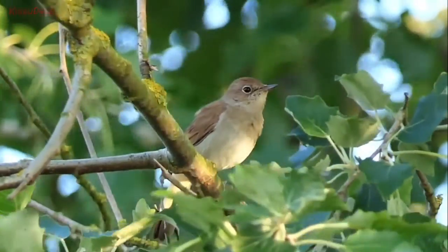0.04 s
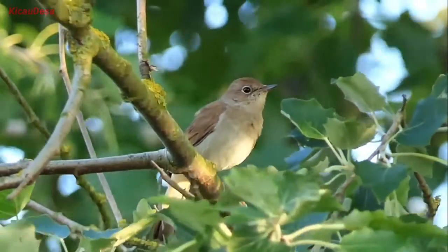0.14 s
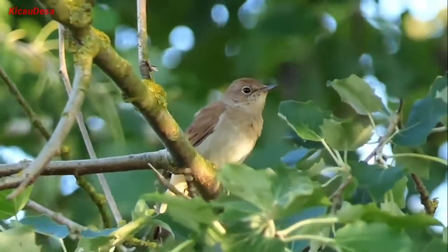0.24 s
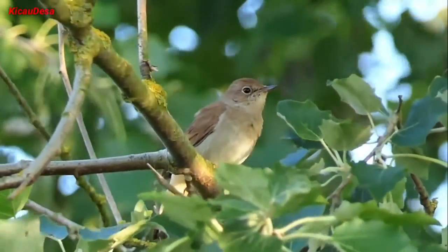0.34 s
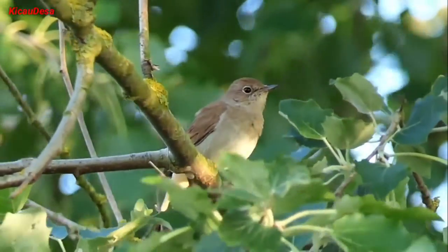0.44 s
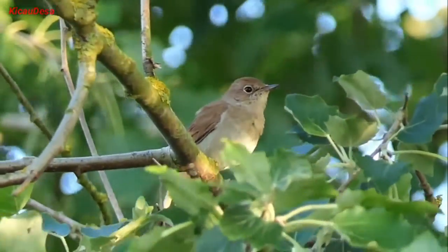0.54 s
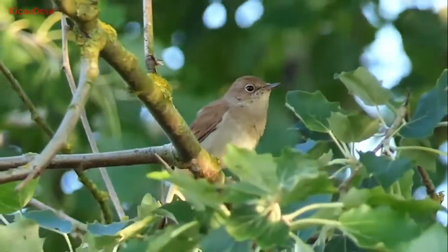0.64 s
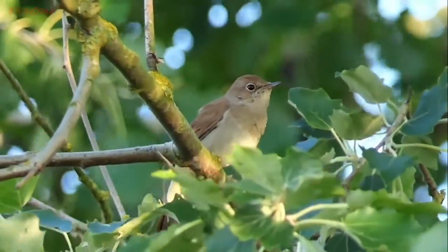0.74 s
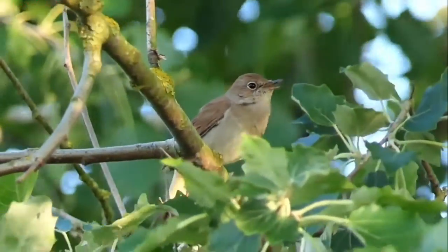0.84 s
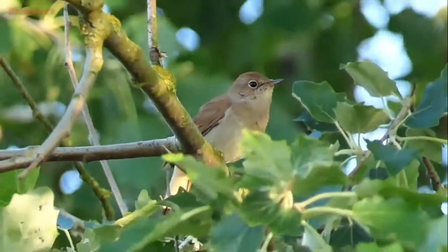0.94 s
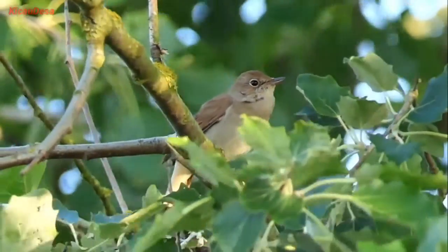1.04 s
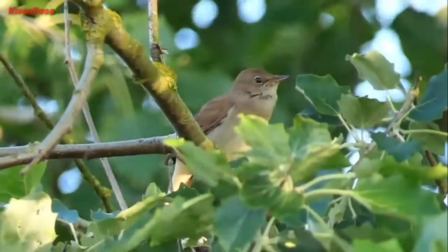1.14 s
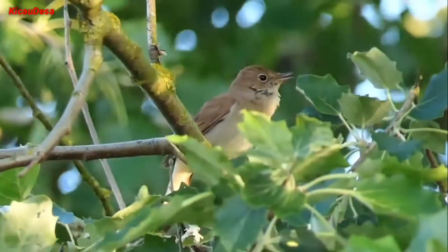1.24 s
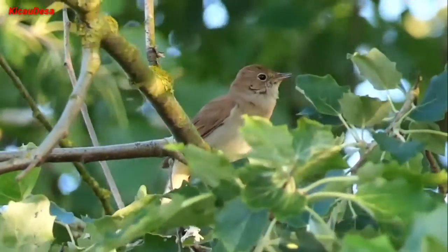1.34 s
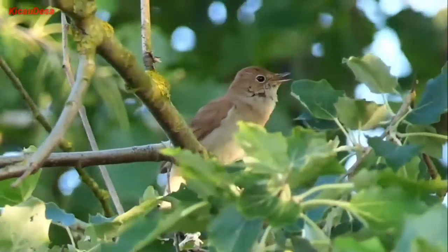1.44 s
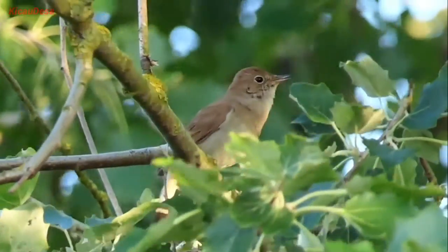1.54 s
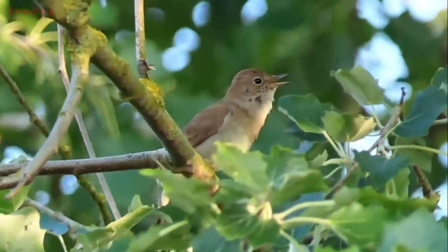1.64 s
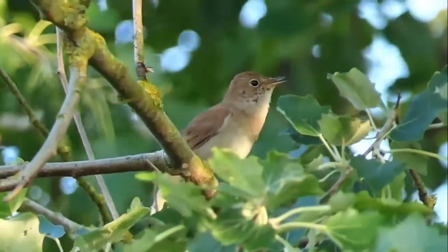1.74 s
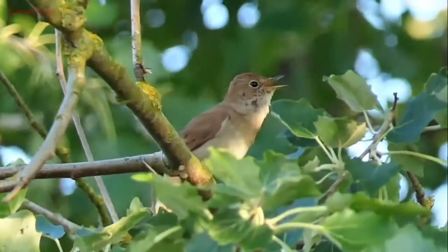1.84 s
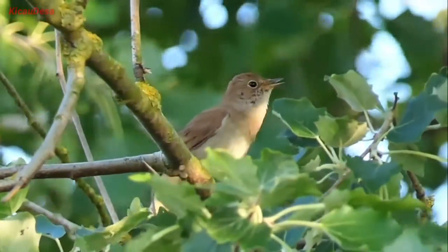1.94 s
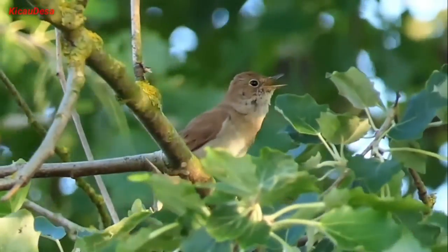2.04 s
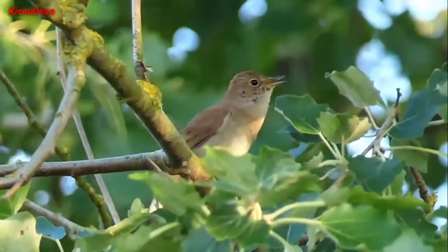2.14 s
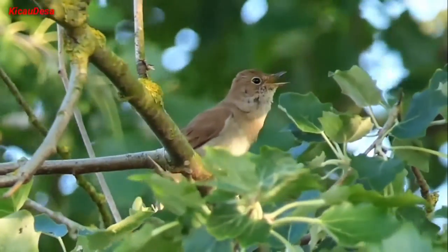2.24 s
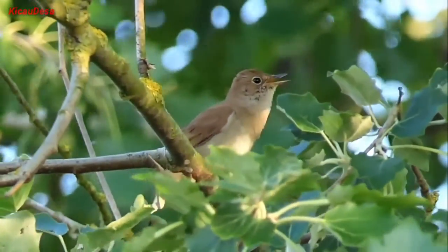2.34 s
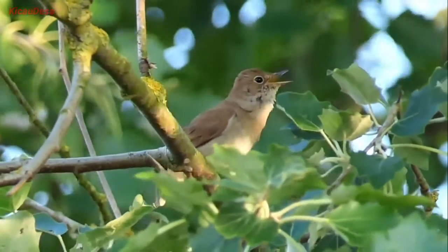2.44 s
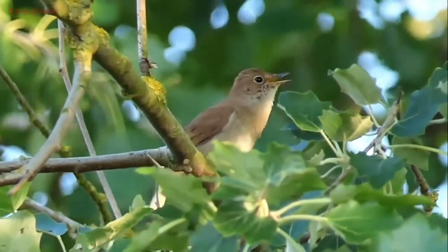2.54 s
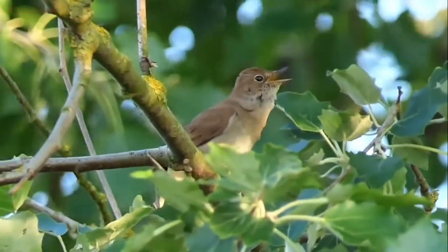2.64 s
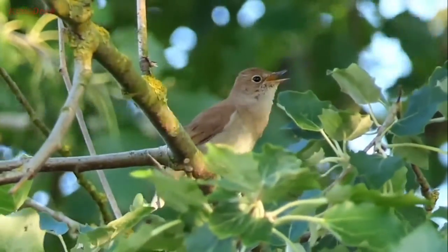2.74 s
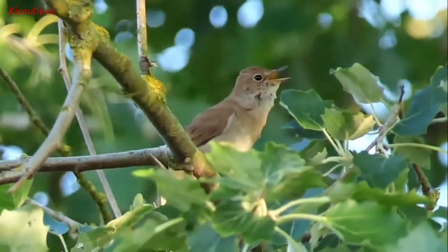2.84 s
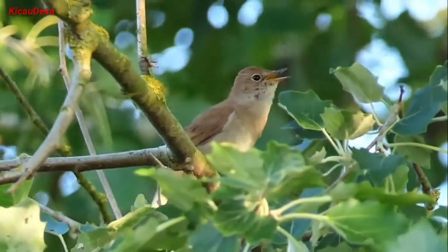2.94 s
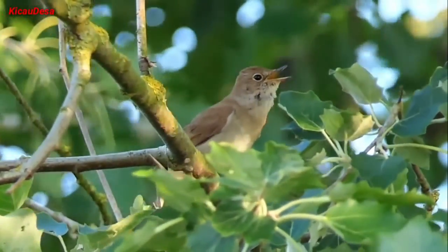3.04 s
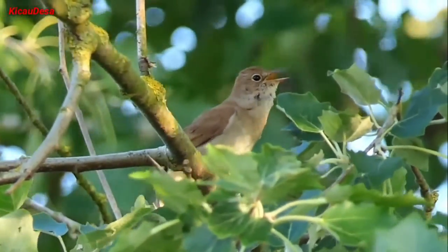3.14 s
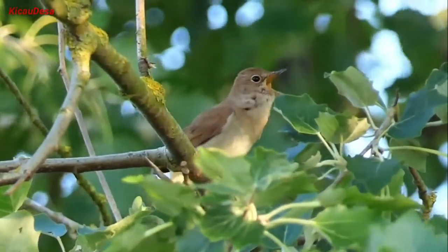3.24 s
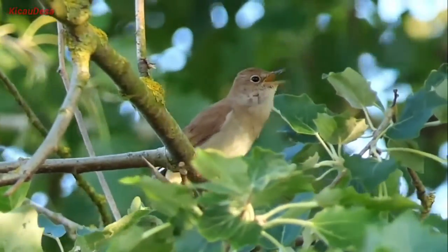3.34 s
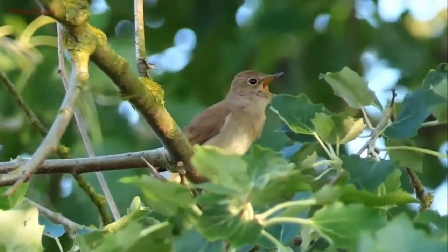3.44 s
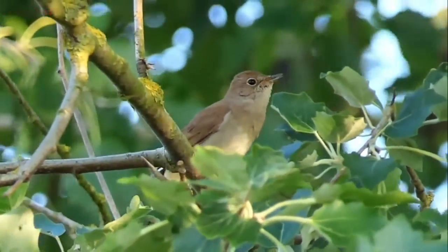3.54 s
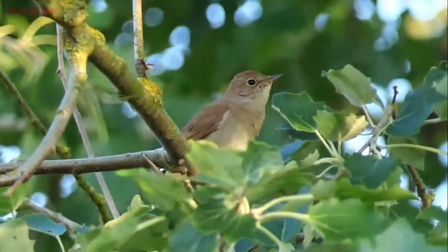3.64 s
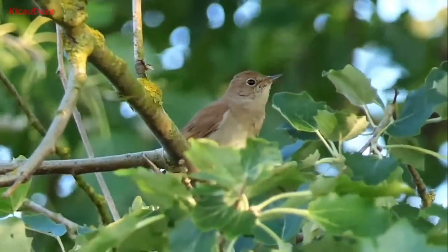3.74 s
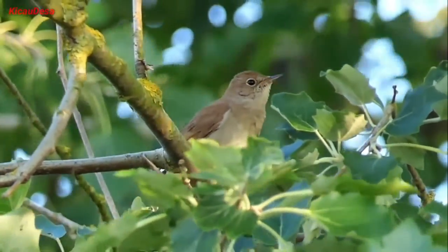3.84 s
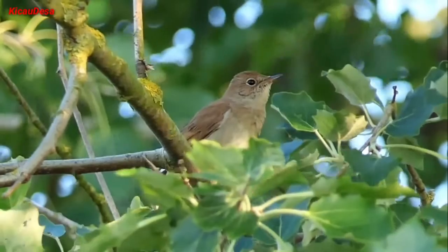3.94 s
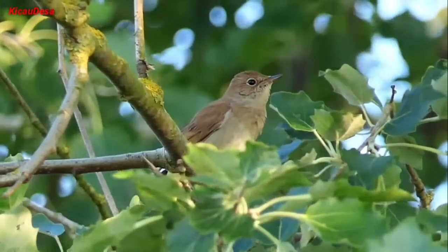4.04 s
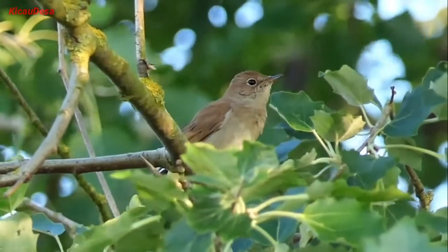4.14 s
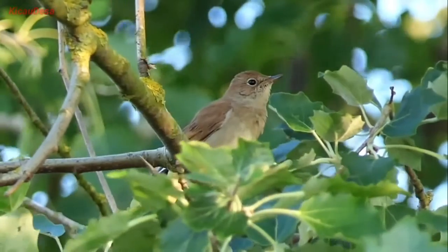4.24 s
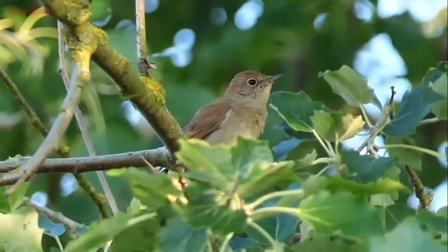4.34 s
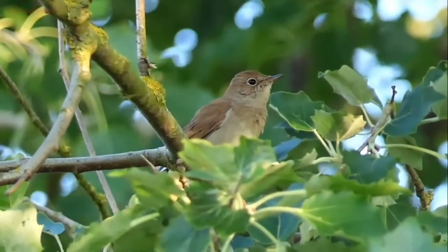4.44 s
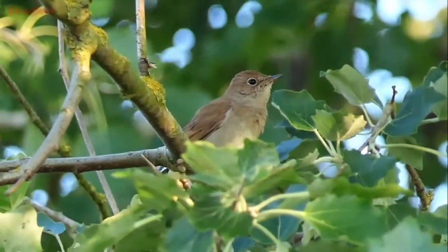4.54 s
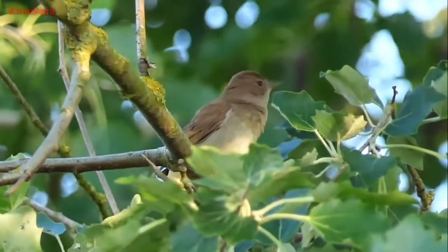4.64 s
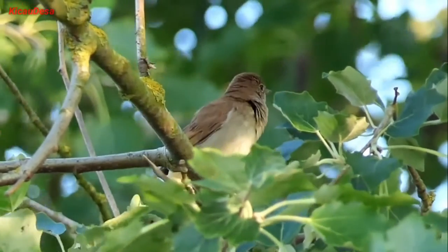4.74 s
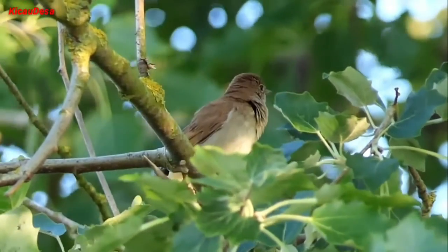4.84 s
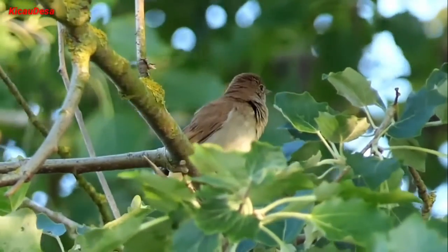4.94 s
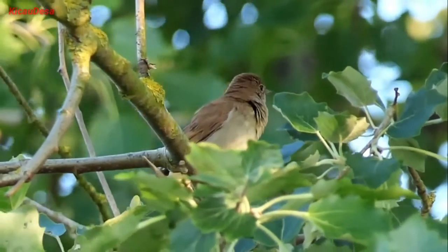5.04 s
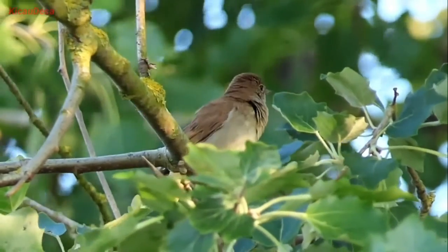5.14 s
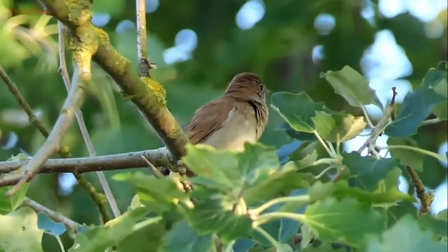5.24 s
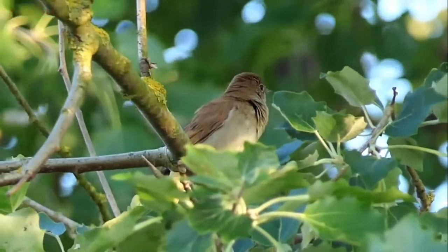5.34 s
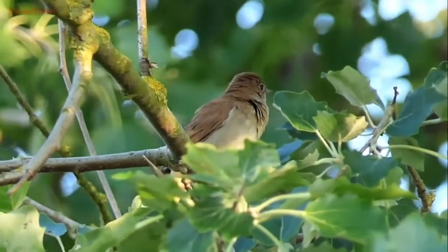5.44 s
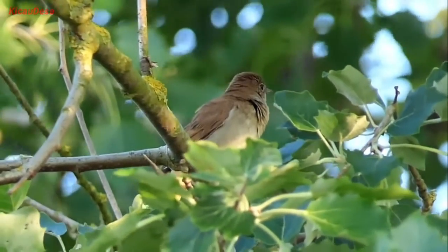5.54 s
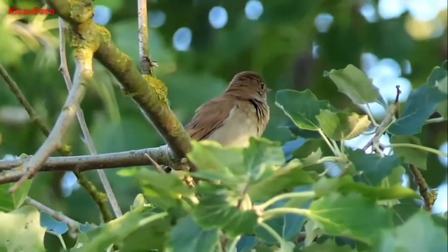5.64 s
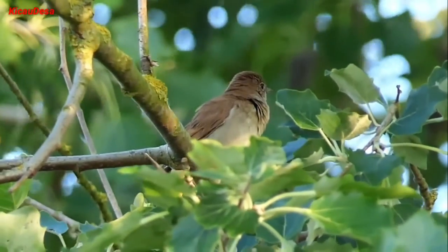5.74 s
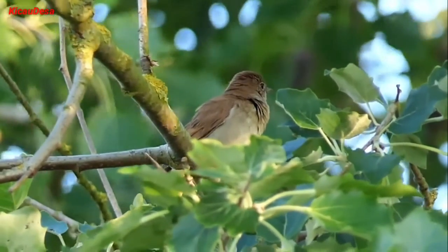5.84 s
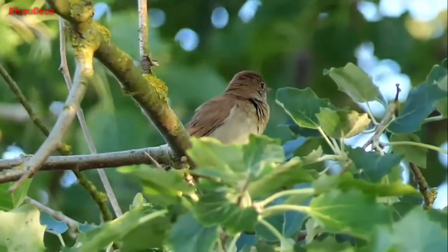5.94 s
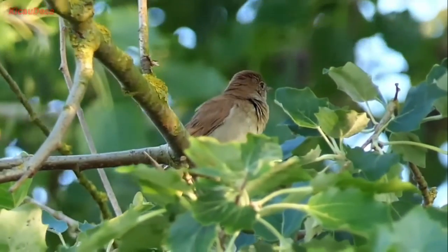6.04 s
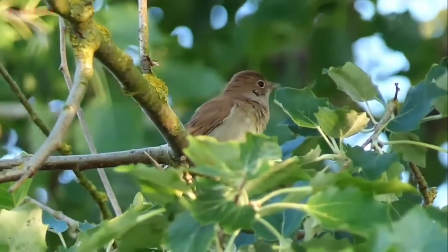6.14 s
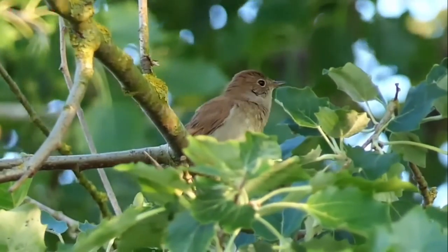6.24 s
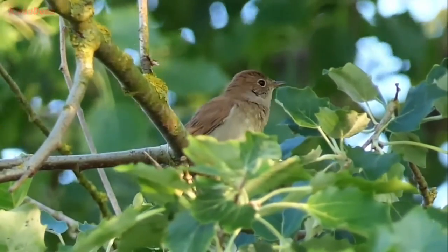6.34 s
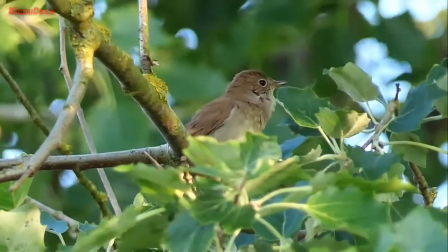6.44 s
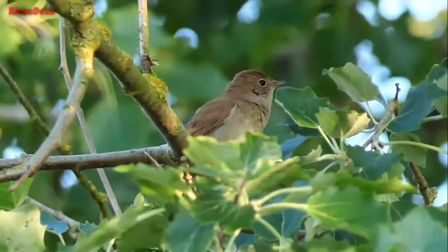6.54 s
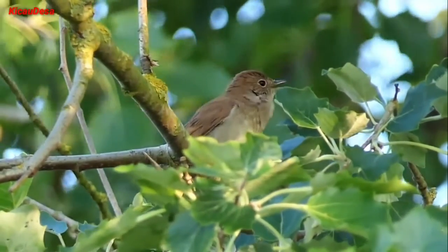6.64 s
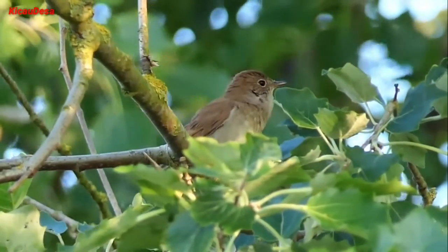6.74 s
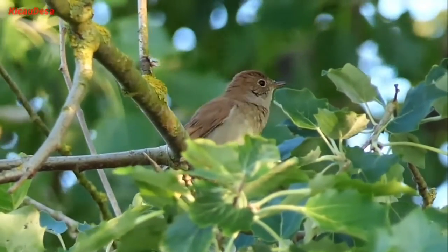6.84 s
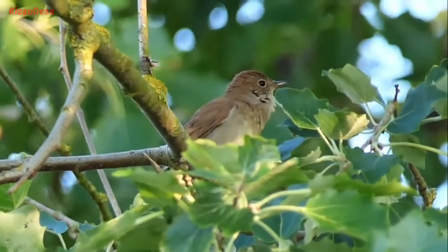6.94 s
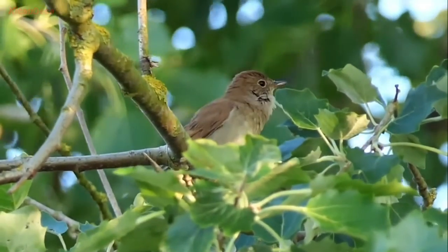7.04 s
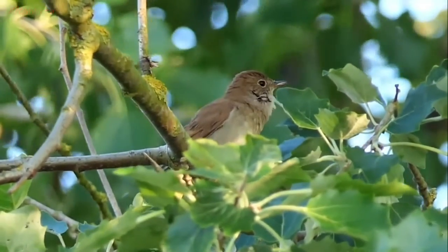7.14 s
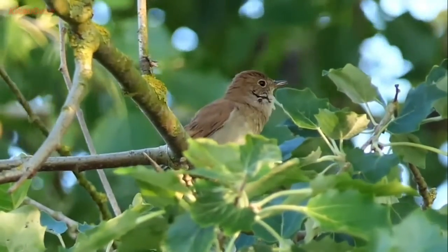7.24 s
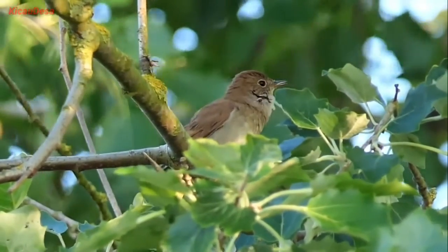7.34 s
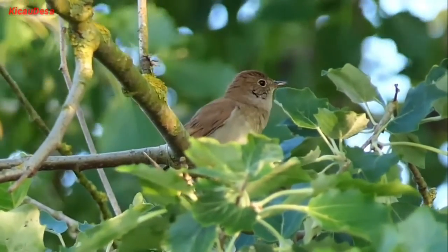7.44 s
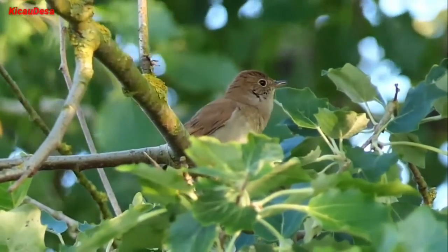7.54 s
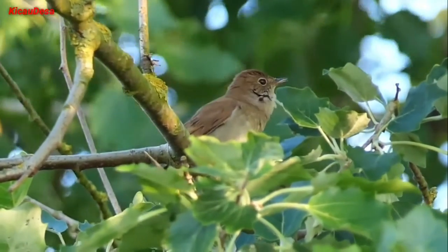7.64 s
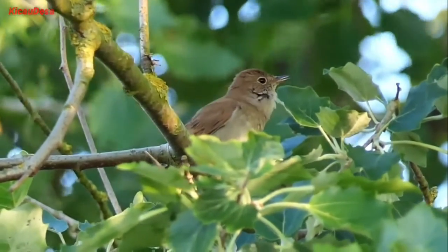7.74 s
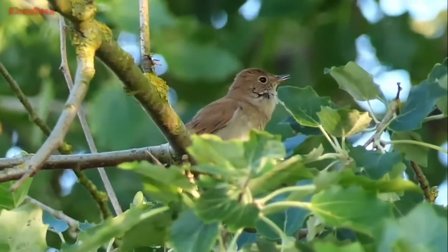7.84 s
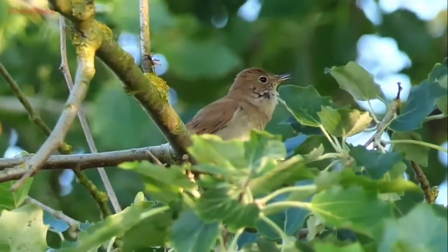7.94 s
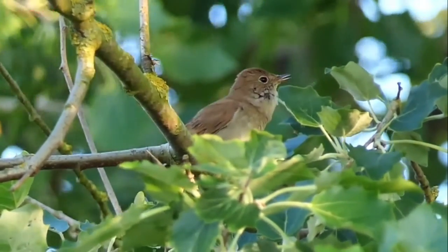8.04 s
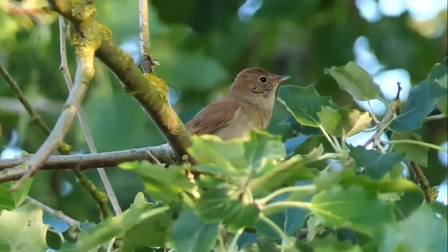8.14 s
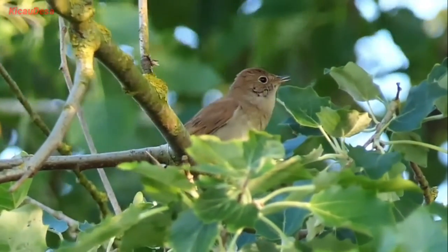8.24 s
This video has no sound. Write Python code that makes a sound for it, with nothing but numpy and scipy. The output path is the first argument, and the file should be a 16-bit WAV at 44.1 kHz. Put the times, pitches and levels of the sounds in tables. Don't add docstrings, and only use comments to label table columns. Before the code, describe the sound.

Outdoors among leafy trees, thin high seeps and small chirps open the scene. A close nightingale then repeats clear whistles, growing steadily louder and faintly rattling, and ends on a lightning-fast fluted flourish with a rasp. In its pause, further birds warble, twitter, tick and cluck before two long low pipes return. Closely spaced stereo microphones catch soft leaf echoes, faint traffic hum and air hiss.

```python
import sys
import numpy as np
from scipy import signal
from scipy.fft import rfft, irfft, next_fast_len
from scipy.io import wavfile
from scipy.ndimage import uniform_filter1d, map_coordinates

SR = 44100
rng = np.random.default_rng(int(sys.argv[2]) if len(sys.argv) > 2 else 0)


def to_wav(sig):
    pcm = np.clip(np.atleast_2d(sig), -1, 1) * 32767
    pcm = np.round(pcm).astype(np.int16)
    wavfile.write(sys.argv[1], SR, pcm.T)


def gain_from_db(level_db):
    decades = np.asarray(level_db, float) / 20
    return 10 ** decades


N = 365148
TOP_HZ = 15480

THIN_OVERTONES = [-37.5]
# (share of length, place between first and second pitch, level [dB])
SLOPE_SHAPE = [(0, 0.017, -7), (.45, 0.57, -0.5), (1, 0.9, -10)]


def unit(x):
    return x / np.sqrt(np.mean(x ** 2) + 1e-20)


def along(points, hz):
    f, v = np.transpose(points)
    return np.interp(np.log(hz + 1), np.log(f + 1), v)


def wobble(count, rate_hz):
    knots = rng.standard_normal(int(count * rate_hz / SR) + 4)
    return map_coordinates(knots, [np.arange(count) * rate_hz / SR])


def shaped(x, gain):
    m = next_fast_len(N + 8192)
    return irfft(rfft(x, m) * gain(np.fft.rfftfreq(m, 1 / SR)), m)[:N]


def add(track, start_s, sound):
    part = track[max(round(start_s * SR), 0):][:len(sound)]
    part += sound[:len(part)]


def phase_of(pitch_hz):
    return 2 * np.pi * np.cumsum(pitch_hz) / SR


def partials(phase, pitch_hz, overtones_db):
    total = 0
    for k, db in enumerate(overtones_db):
        level = gain_from_db(db + 0.97 * wobble(len(phase), 80))
        total = total + ((k + 2) * pitch_hz < TOP_HZ) * level * np.sin((k + 2) * phase + k)
    return total


def sing(contours, overtones_db, fade_s, flutter_db, rough, bend_s=0.0016, wander_hz=0):
    out = np.zeros(N)
    width = int(bend_s * SR)
    for contour in contours:
        s, hz, db = np.transpose(contour)
        t = np.arange(max(s[0] - fade_s, 0), s[-1] + fade_s, 1 / SR)
        pitch_hz = np.interp(t, s, hz) + wander_hz * wobble(len(t), 45)
        pitch_hz = uniform_filter1d(pitch_hz, size=width, mode="nearest")
        level_db = uniform_filter1d(np.interp(t, s, db), size=width, mode="nearest")
        phase = phase_of(pitch_hz) + rough * wobble(len(t), 300)
        tone = np.sin(phase) + partials(phase + rough * wobble(len(t), 800), pitch_hz, overtones_db)
        edge = np.clip(np.minimum(t - s[0], s[-1] - t) / fade_s + 1, 0, 1) ** 2
        add(out, t[0], tone * edge * gain_from_db(level_db + flutter_db * wobble(len(t), 86.1)))
    return out


def stretched(rows, shape):
    return [[(s + u * length, a_hz + p * (b_hz - a_hz), db + d) for u, p, d in shape]
            for s, length, a_hz, b_hz, db in rows]


def seep_contours(rows, sag_hz):
    # (share of length, place between low and top pitch, level [dB])
    seep_shape = [(0, -.2, -12), (.06, 0.7, -10), (0.169, 0.94, -5), (.42, 0.54, -0.5), (.93, .3, -6),
                  (0.999, -0.11, -13.5)]
    spans = [(s, length, top_hz - sag_hz, top_hz, db) for s, length, top_hz, db in rows]
    return stretched(spans, seep_shape)


def air():
    # (frequency [Hz], level [dB])
    air_db = [(20, 1.5), (35, -7), (48, 0.5), (62, -9.5), (85, -24), (200, -21), (320, -30.5), (420, -27),
              (560, -18), (1000, -19), (2000, -25.5), (5000, -29.5), (9000, -42), (15500, -45)]
    # (frequency [Hz], level [dB])
    air_side_db = [(20, 0.5), (50, -1), (100, -9.5), (300, -17), (700, -15), (2000, -17.5), (6000, -16.5),
                   (15500, -22.5)]
    # (time [s], level [dB])
    chorus = [
        (0, -68),
        (.62, -58),
        (3.902, -58.5),
        (4.399, -80),
        (4.9, -47.5),
        (5.6, -56),
        (6.4, -68),
        (7.1, -60),
        (8.28, -64),
    ]
    mid = gain_from_db(-52.0) * unit(shaped(rng.standard_normal(N), lambda hz: gain_from_db(along(air_db, hz))))
    side = gain_from_db(-70) * unit(shaped(rng.standard_normal(N), lambda hz: gain_from_db(along(air_side_db, hz))))
    z = signal.stft(rng.standard_normal(N), nperseg=512)[2]
    field = uniform_filter1d(rng.standard_normal(z.shape), size=7, axis=0)
    field = uniform_filter1d(field, size=12, axis=1)
    haze = signal.istft(z * gain_from_db(6 * unit(field)), nperseg=512)[1][:N]
    haze = unit(shaped(haze, lambda hz: gain_from_db(-((hz - 6000) / 1300) ** 2)))
    s, db = np.transpose(chorus)
    mid = mid + haze * gain_from_db(np.interp(np.arange(N) / SR, s, db) - 13.0)
    return np.array([mid + side, mid - side])


def foliage(x, side_db, quick):
    # (frequency [Hz], 60 dB decay time [s])
    leaves_t60_s = [(1000, 0.28), (3000, 0.5), (8000, 0.42), (11000, .3), (15000, 0.15)]
    hz, t, z = signal.stft(rng.standard_normal((2, SR)), SR, nperseg=256)
    fall = gain_from_db(-60 * t / along(leaves_t60_s, hz)[:, None])
    tail = signal.istft(z * (fall + quick * fall ** 4), SR, nperseg=256)[1]
    tail = tail / np.linalg.norm(tail[0])
    mid, side = signal.fftconvolve(np.pad(x, (150, 0))[None], tail, axes=1)[:, :N]
    side = shaped(side, lambda hz: gain_from_db(side_db + 0.37 * hz / 1000))
    return np.array([mid + side, mid - side])


def trunks(x):
    # (delay [s], level [dB])
    echoes = [
        (.012, -15),
        (.027, -20),
        (.043, -23),
    ]
    return sum(gain_from_db(db) * np.pad(x, (round(s * SR), 0))[:N] for s, db in echoes)


def chatter(count):
    out, u = np.zeros(N), np.linspace(0, 1, 1300)
    for when, height, slide, size in rng.random((count, 4)):
        pitch_hz = (3400 + 5000 * height) * (1 + .4 * (slide - .5) * u ** 2)
        level = gain_from_db(-65.0 + 8 * (size - height))
        add(out, N / SR * when ** .28, level * np.sin(np.pi * u) * np.sin(phase_of(pitch_hz)))
    return out


def trills():
    # (time [s], length [s], first pitch [Hz], last pitch [Hz], level [dB])
    trill_rows = [(4.14, .1, 8840, 8750, -75), (4.3, .12, 8730, 8100, -72), (4.5, 0.13, 8550, 8180, -73.5),
                  (4.59, 0.11, 7050, 6760, -61.5), (5.1, 0.081, 7360, 7500, -62.5),
                  (5.15, 0.1, 8700, 8350, -72), (5.529, 0.11, 7460, 7770, -62),
                  (5.55, 0.055, 10000, 9850, -67), (5.96, .09, 10300, 9870, -74),
                  (6.051, 0.09, 7750, 7200, -67.5), (6.11, 0.065, 9300, 9200, -63),
                  (6.26, 0.089, 7100, 7300, -65), (7.04, 0.056, 5700, 5300, -60),
                  (7.47, 0.069, 6300, 5980, -64), (.28, 0.15, 7800, 8000, -65),
                  (3.91, 0.085, 7800, 7500, -62.5)]
    rate_hz, swing_hz = 37.65, 300
    out = np.zeros(N)
    for s, length, a_hz, b_hz, db in trill_rows:
        t = np.arange(0, length, 1 / SR)
        swing = np.sin(2 * np.pi * rate_hz * t + 1.32 * wobble(len(t), 20.3))
        pitch_hz = np.linspace(a_hz, b_hz, len(t)) + swing_hz * swing
        tone = np.sin(phase_of(pitch_hz) + 0.66 * wobble(len(t), 487))
        level = gain_from_db(db + 2.3 * wobble(len(t), 62))
        add(out, s, level * signal.windows.tukey(len(t), .4) * tone)
    return out


def far_birds():
    # (time [s], length [s], top pitch [Hz], level [dB])
    far_seeps = [
        (1.97, 0.27, 7180, -58),
        (2.17, 0.14, 7350, -54),
        (5.21, 0.185, 7090, -53.5),
        (5.44, 0.14, 7170, -50.5),
        (5.62, 0.128, 7150, -53.5),
        (7.8, 0.22, 7190, -55),
        (7.98, .2, 7240, -50.5),
        (8.18, .16, 7120, -55),
    ]
    # (time [s], length [s], first pitch [Hz], second pitch [Hz], level [dB])
    far_glides = [
        (3.18, 0.12, 7500, 6800, -55.5),
        (4.75, 0.43, 7000, 6880, -63.5),
        (7.87, 0.16, 4800, 4700, -55.5),
        (7.87, 0.048, 3200, 2900, -51),
        (8.3, 0.095, 6000, 5200, -54),
        (.27, 0.12, 3600, 3450, -59),
        (.57, 0.26, 3300, 3800, -61.5),
                  (2.7, 0.09, 5200, 3700, -52.5), (1.8, 0.17, 3050, 5000, -66), (7.03, 0.13, 3300, 3400, -62),
               (7.38, 0.0622, 5150, 4800, -60), (7.64, 0.078, 4600, 6300, -60),
               (6.61, 0.11, 2600, 3750, -58), (4.8, 0.036, 1700, 2300, -62), (6.56, 0.028, 3000, 3350, -53),
               (6.163, .012, 4850, 4200, -51), (6.18, 0.0204, 4450, 3750, -49),
               (8.1, .013, 4000, 3900, -55), (7.565, .035, 4500, 4800, -58.5),
               (7.155, 0.018, 5700, 6100, -53.5), (7.625, 0.023, 5500, 5900, -57),
               (6.4, 0.039, 2900, 4500, -54), (8.26, .02, 3700, 5100, -56), (8.13, .06, 7400, 6900, -59),
               (7.585, 0.026, 4500, 4750, -54.5), (6.955, .018, 4300, 3800, -56.5),
               (6.8, .025, 3300, 3900, -56), (7.675, 0.0123, 6700, 6600, -55), (8.7, .015, 5000, 6300, -54),
               (4.67, 0.06, 4200, 4150, -57.5), (8.07, 0.035, 3100, 3800, -55.5)]
    contours = seep_contours(far_seeps, sag_hz=270) + stretched(far_glides, SLOPE_SHAPE)
    return sing(contours, THIN_OVERTONES, fade_s=0.011, flutter_db=3.0, rough=1.0,
                wander_hz=40.6) + trills()


def tacks():
    # (time [s], peak level [dB], length [s], brightness above 9 kHz [dB])
    tack_calls = [(0.377, -26, 0.0037, -43), (0.824, -31, 0.0085, -52), (1.436, -28.5, 0.0066, -31),
                  (1.928, -27, 0.0058, -38), (2.378, -26.5, 0.0063, -37), (2.944, -28.5, 0.0088, -38),
                  (3.394, -25.5, 0.022, -18), (3.415, -20, 0.022, -15.5), (3.565, -43, .04, -2),
                  (3.658, -21.5, .022, -5), (4.075, -25.5, 0.006, -37), (5.771, -24, 0.0064, -30),
                  (6.133, -29, 0.0071, -38), (6.702, -28.5, 0.008, -44.5), (7.302, -34.5, 0.019, -46),
                  (7.939, -29, 0.0054, -43)]
    # (frequency [Hz], level [dB])
    tack_db = [(1000, -31), (1800, -19.5), (4000, -7.5), (7000, -6), (8600, -12.5), (9600, -30.5),
               (12000, -60.5)]
    body, top = np.zeros(N), np.zeros(N)
    for s, db, length, bright_db in tack_calls:
        u = np.arange(4000) / SR / max(length, .003)
        burst = np.minimum(u / 0.41, 1) ** 2 * np.exp(-u ** 2) * gain_from_db(1.4 * wobble(4000, 450))
        add(body, s - .0015, gain_from_db(db + 2.0) * burst * rng.standard_normal(4000))
        add(top, s - .0015, gain_from_db(db + bright_db + 4.5) * burst * rng.standard_normal(4000))
    body = shaped(body, lambda hz: gain_from_db(along(tack_db, hz)))
    return body + shaped(top, lambda hz: gain_from_db(-((hz - 12800) / 800) ** 2))


def chucks():
    # (time [s], pitch [Hz], level [dB], octave re tone [dB])
    chuck_calls = [(.815, 1780, -46, -1), (1.055, 1780, -45, 1), (1.077, 2540, -43, -13),
                   (1.086, 2300, -51, -8), (6.376, 1815, -50, 9), (6.384, 2080, -44, -11),
                   (6.424, 1640, -41.5, -17), (6.611, 1980, -51, 11), (6.62, 2325, -46, -4),
                   (6.653, 1800, -40.5, -27), (6.661, 1670, -40, -24.5), (6.863, 2170, -50, -1),
                   (6.872, 1880, -49.5, 10), (6.881, 1820, -48, 9), (6.919, 1700, -37.5, -25),
                   (7.721, 1926, -35.5, -14), (7.72, 2820, -36.5, -28), (7.72, 3720, -40.5, -30),
                   (7.942, 1700, -52, -10), (7.944, 2150, -49, -9), (7.946, 2600, -55, -10)]
    bell_s = 0.0022
    out, grit, t = np.zeros(N), np.zeros(N), np.arange(-500, 500) / SR
    for s, hz, db, octave_db in chuck_calls:
        bell = gain_from_db(db) * np.exp(-(t / bell_s) ** 2)
        octave = gain_from_db(octave_db) * np.sin(4 * np.pi * hz * t + 1.34 * wobble(len(t), 475))
        add(out, s + t[0], bell * (np.sin(2 * np.pi * hz * t) + octave))
        add(grit, s + t[0], bell * gain_from_db(octave_db + 10.5) * rng.standard_normal(len(t)))
    return out + shaped(grit, lambda hz: gain_from_db(-((hz - 3100) / 520) ** 2))


def chips():
    # (time [s], level [dB], overtones [dB], pitch factor)
    chip_calls = [(.085, -55.5, -26, 1.05), (.125, -54.5, -22, 0.98), (.162, -53.5, -16, 1.1),
                  (.212, -57, -30, 1.53), (.287, -51.5, -26, 0.99), (.42, -53, -23, 0.99),
                  (.468, -52, 7.5, 0.92), (.547, -50.5, 3.5, 0.89), (.668, -53, -23, 1.01),
                  (.795, -50.5, -15, 0.95), (.92, -50.5, -21, 1.02), (1.118, -57.5, 10, 1.04),
                  (1.17, -52, -30, 1.2), (1.198, -55, 9, 0.96)]
    chirpy_overtones = [-3, -13, -16, -23]
    length_s, top_hz, bottom_hz = .023, 3460, 2120
    out = np.zeros(N)
    u = np.arange(0, 1, 1 / SR / length_s)
    for s, db, over_db, scale in chip_calls:
        pitch_hz = scale * (bottom_hz + (top_hz - bottom_hz) * (1 - u) ** 2.0)
        phase = phase_of(pitch_hz)
        swell = np.sin(np.pi * u ** 0.86) * gain_from_db(3 * wobble(len(u), 300))
        tone = np.sin(phase + .5 * wobble(len(u), 620))
        over = partials(phase + 0.86 * wobble(len(u), 810), pitch_hz, chirpy_overtones)
        add(out, s, gain_from_db(db) * swell * (tone + gain_from_db(over_db) * over))
    return out


def twitters():
    # (time [s], top pitch [Hz], level [dB])
    twitter_calls = [(1.798, 8000, -54), (1.828, 8160, -53.5), (7.012, 7100, -60), (7.252, 7830, -60),
                     (6.469, 8200, -56.5), (6.505, 7940, -58), (6.631, 8040, -55), (7.001, 8130, -58),
                     (7.215, 8040, -53), (8.0, 8060, -51)]
    out = np.zeros(N)
    u = np.linspace(-1, 1, 1100)
    for s, top_hz, db in twitter_calls:
        phase = phase_of(top_hz * (1 - .13 * abs(u) ** 1.5))
        add(out, s - .012, gain_from_db(db) * (1 - u ** 2) * np.sin(phase))
    return out


def near_seeps():
    # (time [s], length [s], top pitch [Hz], level [dB])
    close = [
        (-.04, 0.15, 7186, -31.5),
        (.153, 0.12, 7183, -30.5),
        (.337, 0.1336, 7140, -30),
        (.517, 0.12, 7076, -30.5),
    ]
    midway = [
        (1.608, 0.14, 7210, -46.5),
        (1.814, 0.12, 7160, -48.5),
        (3.718, .12, 7150, -44.5),
        (3.894, 0.13, 7070, -43.5),
        (4.096, 0.13, 6970, -50.5),
    ]
    return sing(seep_contours(close + midway, sag_hz=480), THIN_OVERTONES,
                fade_s=0.0041, flutter_db=0.5, rough=0.15)


def warbler():
    # (share of length, place between first and second pitch, level [dB])
    hooks, hook_shape = [(4.56, 0.057, 5240, 6500, -51), (4.755, 0.065, 5000, 6290, -42.5),
                         (4.9, 0.075, 4090, 6410, -36), (5.36, 0.022, 3670, 5090, -32),
                         (6.57, .073, 4200, 6590, -39), (7.186, 0.06, 5850, 6590, -46)], [(0, 1, -15), (.65, .84, -7.5), (.85, .55, -4), (1, 0.039, -14.5)]
    dips, dip_shape = [(5.04, 0.094, 3710, 5180, -35.5), (5.2, 0.089, 3500, 5250, -36.5),
                       (6.036, 0.0295, 1740, 2080, -53)], [(0, .6, -6.5), (.44, 0.079, -0.5), (.6, 0.44, -1.5), (.8, .8, -1.5),
                                     (1, 0.97, -6.5)]
    rises, rise_shape = [(5.402, 0.066, 2700, 3636, -43), (5.737, 0.07, 2710, 3460, -40)], [(0, 0.04, -12.5), (.25, 0.62, 0.5), (.65, .92, -4), (1, 0.94, 4)]
    slopes = [(5.478, 0.061, 2040, 3380, -48.5), (5.607, 0.069, 1970, 3210, -47.5),
              (5.742, 0.052, 1960, 3030, -47.5), (5.883, 0.064, 3150, 2350, -40.5),
              (6.067, 0.062, 3240, 2155, -43), (6.086, 0.011, 2650, 1590, -47),
              (6.245, 0.07, 2260, 2950, -46.5), (6.725, 0.022, 5500, 4830, -49),
              (7.41, 0.0198, 3800, 3040, -46), (8.06, .018, 5470, 4830, -51.5),
              (7.625, 0.014, 6000, 6660, -47.5), (5.23, 0.18, 2690, 2710, -54.5),
              (5.885, 0.022, 4950, 3880, -48)]
    slides, slide_shape = [(5.553, 0.071, 3200, 2540, -43), (6.385, 0.12, 6530, 4030, -43),
                           (7.058, 0.037, 5730, 4500, -54), (7.46, 0.0279, 7050, 5560, -58),
                           (7.83, 0.033, 4620, 3550, -48)], [(0, 0.052, -8), (.45, 0.73, -1), (1, 1, -11)]
    arches, arch_shape = [(5.614, 0.028, 3090, 4890, -37), (5.688, 0.041, 3600, 5080, -39),
                          (5.965, .018, 2950, 4610, -36), (6.152, 0.02, 3000, 4080, -41)], [(0, 0.023, -14), (.25, .7, 1.5), (.5, 0.98, -5), (.75, .65, -15),
                                          (1, 0.061, -11)]
    kinds = [(hooks, hook_shape), (dips, dip_shape), (rises, rise_shape), (slopes, SLOPE_SHAPE),
             (slides, slide_shape), (arches, arch_shape)]
    contours = [contour for rows, shape in kinds for contour in stretched(rows, shape)]
    return sing(contours, THIN_OVERTONES, fade_s=0.0086, flutter_db=2.0, rough=0.073, bend_s=0.0031)


def long_pipes():
    # (time [s], pitch [Hz], level [dB])
    registers = [
        [(7.125, 1222, -57), (7.139, 1217, -51), (7.199, 1233, -49), (7.227, 1217, -50), (7.529, 1294, -47),
         (7.605, 1290, -47)],
        [(7.612, 1383, -52), (7.622, 1382, -43), (7.64, 1390, -67)],
        [(7.85, 1314, -56), (7.86, 1300, -48.5), (7.914, 1303, -45.5), (7.925, 1321, -43)],
        [(7.93, 1343, -45), (8.018, 1369, -39), (8.074, 1363, -42), (8.12, 1353, -40), (8.258, 1383, -39),
         (8.28, 1403, -37)],
    ]
    pipe_overtones = [-14, -37]
    return sing(registers, pipe_overtones, fade_s=.01, flutter_db=1.4, rough=0.14, wander_hz=10)


def rasps():
    # (time [s], pitch [Hz], level [dB])
    rasp_contours = [
        [(3.651, 1262, -43), (3.658, 1492, -24), (3.667, 1945, -21.5), (3.674, 2430, -18), (3.679, 2670, -20),
         (3.688, 2856, -20)],
    ]
    # (frequency [Hz], level [dB])
    beak_db = [(1500, -62), (3000, -6.5), (5500, -6), (7500, 2.5), (8800, -4.5), (10500, -28), (12500, -19),
               (15500, -24)]
    out = np.zeros(N)
    for contour in rasp_contours:
        s, hz, db = np.transpose(contour)
        t = np.arange(s[0], s[-1], 1 / SR)
        pitch_hz = np.interp(t, s, hz)
        phase = phase_of(pitch_hz) + .26 * wobble(len(t), 900)
        stack = np.zeros(len(t))
        for k in range(2, 10):
            level_db = along(beak_db, k * pitch_hz) + (1 + .7 * k) * wobble(len(t), 350)
            stack += gain_from_db(level_db) * (k * pitch_hz < TOP_HZ) * np.sin(k * phase)
        add(out, s[0], stack * gain_from_db(np.interp(t, s, db)) * signal.windows.tukey(len(t), .2))
    return out


def flourish():
    # (time [s], pitch [Hz], level [dB])
    sweeps = [
        [(3.42, 3240, -34), (3.423, 5200, -26.5), (3.426, 7400, -28), (3.4285, 8600, -38)],
        [(3.423, 2860, -33), (3.427, 4600, -12), (3.4295, 5300, -13), (3.4315, 5220, -25)],
        [(3.433, 5070, -12), (3.437, 3976, -13), (3.444, 3230, -12.5), (3.455, 2926, -15.5),
         (3.468, 3047, -12.5), (3.48, 3285, -8), (3.495, 3497, -14.5), (3.51, 3544, -23)],
        [(3.568, 2490, -23), (3.572, 1854, -21), (3.581, 1541, -22), (3.588, 1853, -22), (3.594, 2325, -14),
         (3.602, 2600, -14.5), (3.614, 2650, -23.5)],
    ]
    flute_overtones = [-50, -47]
    return sing(sweeps, flute_overtones, bend_s=0.0014, fade_s=0.0012, flutter_db=0.5, rough=0.05) + rasps()


def swelling_run():
    # (start [s], end [s], early pitch [Hz], late pitch [Hz])
    whistles = [(1.269, 1.371, 2036, 2042), (1.452, 1.545, 2110, 2085), (1.63, 1.734, 2107, 2090),
                (1.806, 1.927, 2102, 2078), (1.993, 2.114, 2097, 2135), (2.192, 2.313, 2095, 2120),
                (2.39, 2.515, 2052, 2134), (2.589, 2.715, 2022, 2108), (2.796, 2.913, 2011, 2129),
                (3, 3.127, 2019, 2126), (3.221, 3.346, 2017, 2097)]
    # (halfway [dB], at crack [dB], near end [dB], crack place [0-1], rattle re tone [dB])
    effort = [(-30, -37.5, -43.5, 0.78, -50), (-28.5, -27.5, -29.5, 0.5, -45),
              (-27.5, -22.5, -24, 0.4, -42), (-22.5, -22.5, -23, .74, -34.5),
              (-20.5, -18.5, -19.5, .74, -34), (-18.5, -18.5, -21, .76, -24.5),
              (-18.5, -19.5, -18.5, 1, -32.5), (-15.5, -18, -18, 0.7, -35), (-15, -17, -16, 0.8, -20.5),
              (-15, -18.5, -16, .68, -19), (-14, -16.5, -18.5, .69, -20.5)]
    # (time [s], offset [Hz])
    entry = [
        (2.2, 189),
        (2.6, -89),
    ]
    syrinx_overtones = [-36, -44, -42, -46, -31.5, -37]
    rattle_hz, rattle_rise_s, rattle_fall_s = 344, .005, 0.02
    out = np.zeros(N)
    for whistle, push in zip(whistles, effort):
        start, end, early_hz, late_hz = whistle
        half_db, crack_db, late_db, crack, rattle_db = push
        entry_hz = np.interp(start, *np.transpose(entry))
        t = np.arange(0, end - start, 1 / SR)
        u, left = t / t[-1], t[-1] - t
        hook_hz = 330 * np.clip((late_db + 43) / 12, 0, 1)
        pitch_hz = np.interp(u, [.2, .85], [early_hz, late_hz]) + entry_hz * np.exp(-t / 0.013)
        pitch_hz = pitch_hz - hook_hz * np.exp(-left / 0.0045) + 14 * wobble(len(t), 49.7)
        phase = phase_of(pitch_hz)

        half = gain_from_db(half_db)
        size = np.interp(u, [0, .25, .5, np.clip(crack, .55, .85), .88],
                         [0.035 * half, 0.27 * half, half, gain_from_db(crack_db), gain_from_db(late_db)])
        edges = np.clip(np.minimum(left / 0.012, t / .007), 0, 1)
        size = uniform_filter1d(size, size=300) * edges * gain_from_db(0.76 * wobble(len(t), 70))

        since = t - crack * t[-1]
        spread_s = np.where(since < 0, rattle_rise_s, rattle_fall_s)
        burst = 2 * gain_from_db(rattle_db) * np.exp(-(since / spread_s) ** 2)
        hoarse = (.085 + 2.5 * burst) * wobble(len(t), 700)
        swing = 2 * np.pi * rattle_hz * t + wobble(len(t), 65)
        beat = burst * (np.sin(swing) + 0.15 * np.sin(2 * swing))

        strain = (size / gain_from_db(-16)) ** .3 * gain_from_db(2.2 * wobble(len(t), 30))
        over = strain * partials(phase + hoarse + 4.8 * beat, pitch_hz, syrinx_overtones)
        tone = np.sin(phase + 0.23 * hoarse) * (1 + 0.18 * hoarse + beat)
        flare = gain_from_db(late_db - 29.5) * np.exp(-((left - .006) / 0.0056) ** 2)
        add(out, start, flare * np.sin(2 * phase))
        add(out, start, size * (tone + over))
    return out


def scene():
    run = swelling_run() + long_pipes()
    quick_notes = flourish()
    others = near_seeps() + chucks() + chips() + twitters() + warbler()
    far = far_birds()
    harsh = tacks()
    run_treble = shaped(run, lambda hz: gain_from_db(hz / 1300 - 1.6))
    out = run + trunks(run) + gain_from_db(-20.5) * foliage(run_treble, side_db=-24, quick=0)
    out += quick_notes + gain_from_db(-2.5) * trunks(quick_notes)
    out += gain_from_db(-14.5) * foliage(quick_notes, side_db=-17, quick=1.2)
    out += others + gain_from_db(-3.5) * trunks(others) + gain_from_db(-8.5) * foliage(others, side_db=-28.5, quick=4.5)
    out += 1.27 * far + gain_from_db(-2.0) * foliage(far + chatter(count=220), side_db=-22.0, quick=0.64)
    out += harsh + gain_from_db(-0.5) * foliage(harsh, side_db=-21, quick=2.5)
    return out + air()


def roll_off(x):
    return signal.sosfilt(signal.butter(12, 15750, fs=SR, output="sos"), x)


def record(dry):
    tilt_db = lambda hz: .55 * (hz / TOP_HZ) ** 2
    left = shaped(dry[0], lambda hz: (hz < TOP_HZ) * gain_from_db(-tilt_db(hz)))
    right = shaped(dry[1], lambda hz: (hz < TOP_HZ) * gain_from_db(tilt_db(hz)))
    return roll_off(np.array([left, right]))


dry = scene()
out = record(dry)
to_wav(out)
```